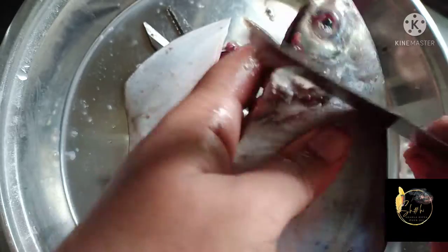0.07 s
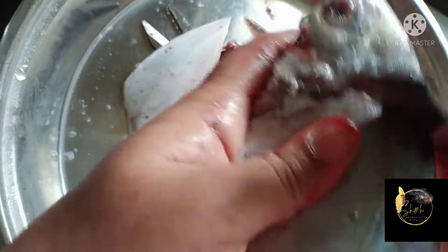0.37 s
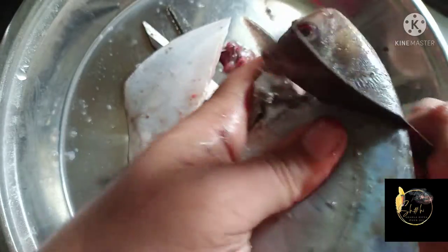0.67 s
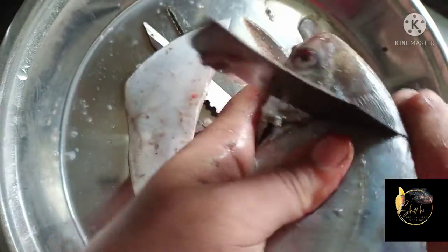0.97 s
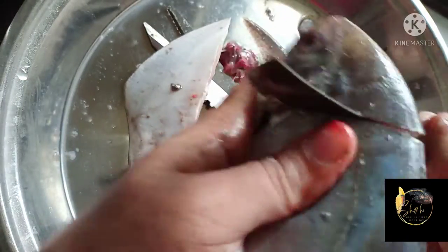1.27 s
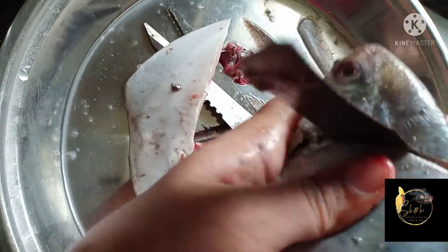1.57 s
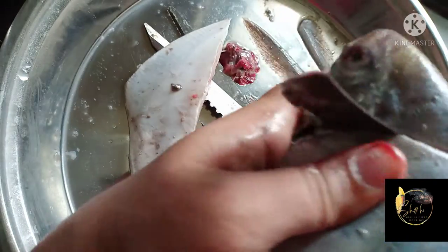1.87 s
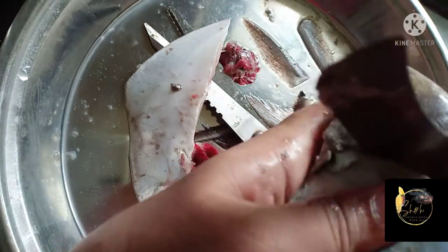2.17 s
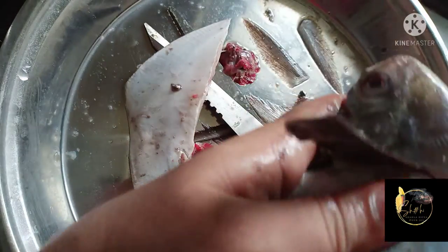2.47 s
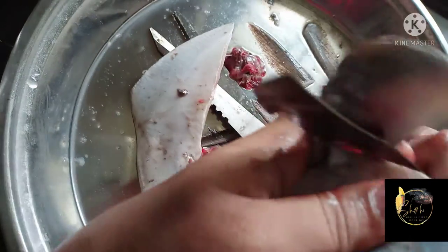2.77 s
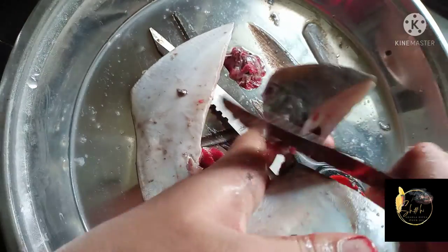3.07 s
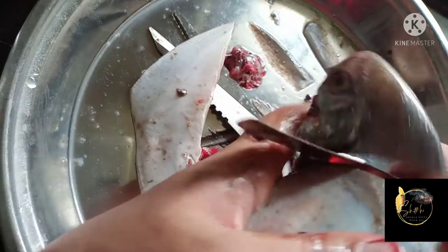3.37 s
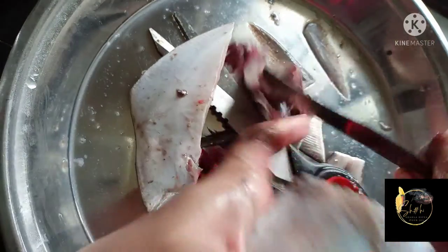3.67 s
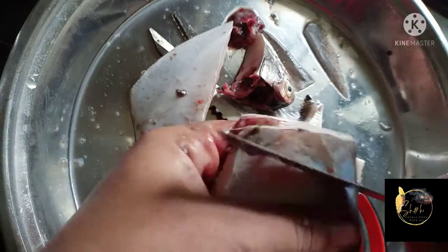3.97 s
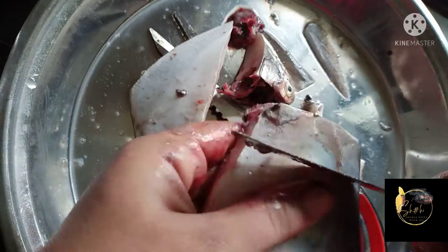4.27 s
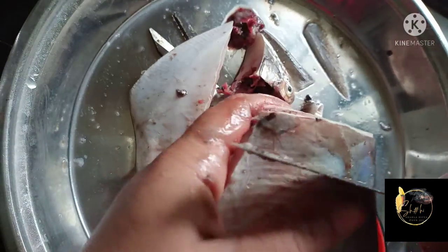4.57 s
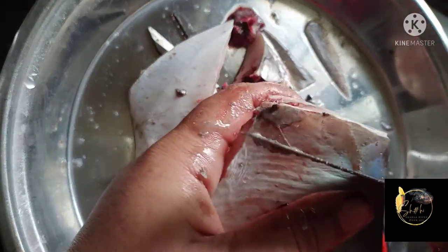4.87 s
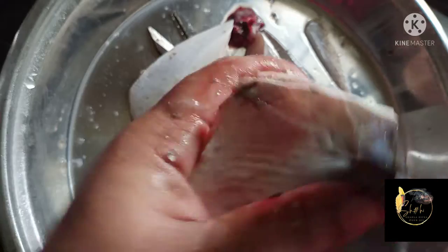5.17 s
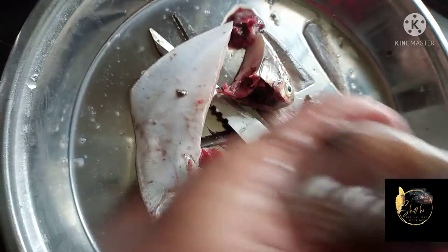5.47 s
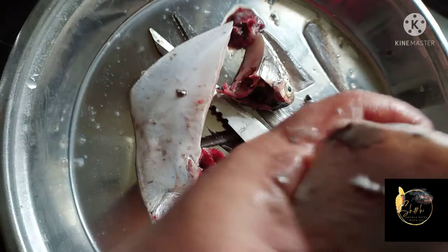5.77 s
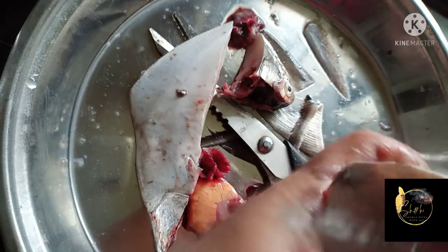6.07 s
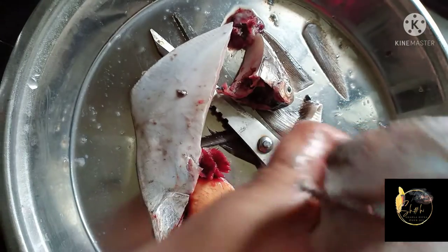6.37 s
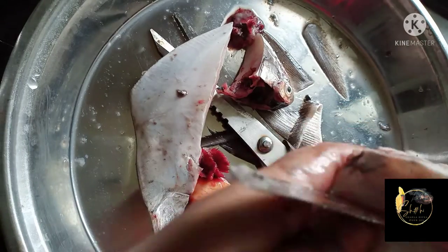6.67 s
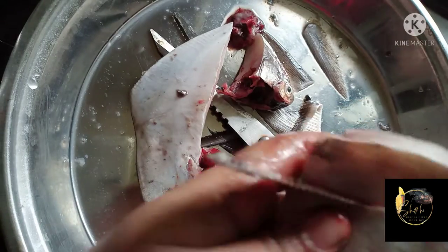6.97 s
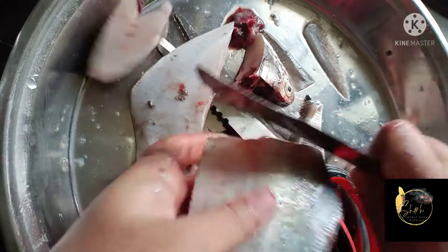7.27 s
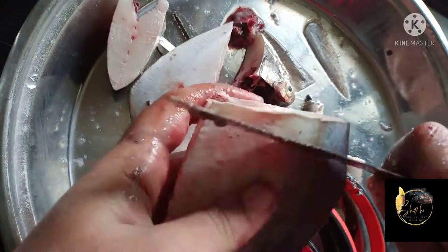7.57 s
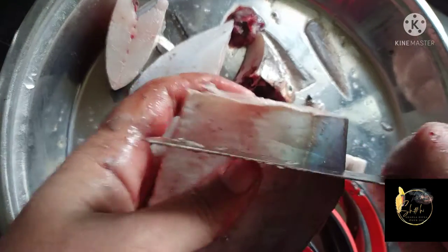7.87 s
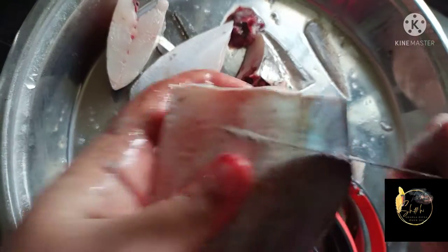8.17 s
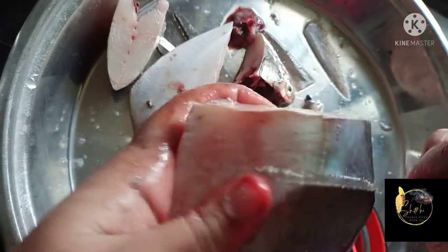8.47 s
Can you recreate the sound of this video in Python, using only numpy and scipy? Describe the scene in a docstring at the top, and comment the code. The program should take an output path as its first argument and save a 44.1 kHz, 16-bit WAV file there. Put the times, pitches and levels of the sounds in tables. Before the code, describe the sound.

Close knife sawing rasps through fish skin and snaps small bones, while cut pieces thud wetly into a ringing steel basin.

```python
"""In a kitchen, close by, a serrated knife saws through a fish over a steel basin.
The teeth rasp through skin and snap small bones, and the blade squeaks as it sticks and slips.
Once it breaks through and clinks on steel. Cut pieces land with wet thuds that ring the basin.
A fan hums over a steady hiss, and a few faint clicks come from farther off."""
import sys
import numpy as np
from scipy import signal
from scipy.fft import rfft
from scipy.io import wavfile
from scipy.ndimage import map_coordinates

SR = 44100
rng = np.random.default_rng(int(sys.argv[2]) if len(sys.argv) > 2 else 0)


def pcm_store(signal):
    """Save signal as 16-bit PCM."""
    levels = np.round(np.clip(np.atleast_2d(signal), -1, 1) * 32767)
    wavfile.write(sys.argv[1], SR, levels.astype(np.int16).T)


N = 379701

# strokes of the knife: t/s, length/s, level/dB
SAW_STROKES = [(0.274, 0.078, -56.5), (0.382, 0.078, -64.5), (0.482, 0.078, -56.5), (0.59, 0.078, -61),
               (0.706, 0.067, -60.5), (0.846, 0.056, -67), (0.951, 0.08, -56.5), (1.039, 0.087, -59),
               (1.153, 0.058, -54.5), (1.237, 0.09, -49.5), (1.323, 0.091, -51.5), (1.431, 0.083, -57),
               (1.528, 0.06, -54.5), (1.636, 0.098, -51), (1.748, 0.098, -53.5), (1.869, 0.086, -52),
               (1.968, 0.077, -51), (2.066, 0.075, -52.5), (2.153, 0.094, -64.5), (2.433, 0.085, -56),
               (2.576, 0.055, -50), (2.666, 0.066, -51.5), (3.363, 0.09, -60), (5.023, 0.07, -65.5),
               (5.174, 0.074, -58.5), (5.276, 0.083, -57), (5.389, 0.069, -54), (5.478, 0.089, -57),
               (5.572, 0.08, -58.5), (5.682, 0.07, -53.5), (5.778, 0.087, -59), (5.892, 0.072, -58),
               (5.969, 0.1, -58.5), (6.084, 0.06, -52), (6.16, 0.092, -55.5), (6.25, 0.025, -61),
               (6.361, 0.096, -65.5), (6.668, 0.082, -69), (6.774, 0.11, -62.5), (6.892, 0.108, -62.5),
               (7.024, 0.054, -63.5), (8.07, 0.093, -58.5), (8.179, 0.092, -58), (8.302, 0.076, -55),
               (8.428, 0.078, -57), (8.536, 0.082, -56.5)]
# notes the steel basin rings at: f/Hz, level/dB, t60/s (time to fade by 60 dB)
BASIN_NOTES = [(172.4, -53, 0.19), (228, -38.5, 0.144), (263, -51.5, 0.38), (307, -40.5, 0.23),
               (330, -26, 0.035), (359.5, -45, 0.45), (402, -31.5, 0.05), (500, -33.5, 0.19),
               (533.3, -43.5, 0.4), (555.5, -27.5, 0.09), (652, -39, 0.14), (876, -52.5, 0.31),
               (780, -40.5, 0.055), (1132, -46.5, 0.15), (1540, -42, 0.18), (1646, -26.5, 0.047),
               (2028, -26.5, 0.034), (1614, -50.5, 0.86), (1639, -49, 0.38), (1822, -58.5, 1),
               (1856, -50.5, 0.82), (2010, -57, 0.78), (2388, -50, 0.42), (2760, -47, 0.44),
               (2854, -49, 0.56), (2900, -44, 0.3)]


def amp(db):
    """Turns decibels into a gain."""
    return 10 ** (np.asarray(db) / 20)


def evened(x):
    """Scales x to an average (rms) size of 1."""
    return x / np.sqrt(np.mean(x ** 2) + 1e-20)


def read(points, hz):
    """Reads between a table's rows on a log-frequency axis."""
    f, value = np.transpose(points)
    return np.interp(np.log(hz + 1), np.log(f + 1), value)


def add(mix, start, sound):
    """Mixes a sound in at a start time in seconds."""
    part = mix[max(round(start * SR), 0):][:len(sound)]
    part += sound[:len(part)]


def seconds(length):
    """The time of each sample over this length."""
    return np.arange(int(length * SR)) / SR


def coloured(x, tone):
    """Shapes the lows and highs of x by a tone table; rms 1."""
    gain = amp(read(tone, np.fft.rfftfreq(len(x), 1 / SR)))
    return evened(np.fft.irfft(rfft(x) * gain, len(x)))


def pulse(tone, size=4096):
    """The shortest sudden tap with this tone; peak 1."""
    log_gain = np.log(amp(read(tone, abs(np.fft.fftfreq(size, 1 / SR)))))
    shape = np.fft.ifft(np.exp(np.conj(signal.hilbert(log_gain)))).real
    return shape / abs(shape).max()


def drift(rate):
    """A smooth random wobble, changing about rate times a second; rms 1."""
    knots = rng.standard_normal(int(N / SR * rate) + 4)
    return evened(map_coordinates(knots, [np.arange(N) * rate / SR], order=2))


def ticks(per_s, spread_db):
    """Tiny random ticks of uneven size; rms 1."""
    size = amp(spread_db * np.minimum(rng.exponential(1, N), 4)) * rng.choice([-1, 1], N)
    return evened(size * (rng.random(N) < per_s / SR))


def resonate(x, hz, width_hz):
    """Makes x ring at a pitch that follows the curve hz; rms 1."""
    turn = np.exp(2j * np.pi * np.cumsum(hz) / SR)
    decay = np.exp(-np.pi * width_hz / SR)
    return evened((turn * signal.lfilter([1], np.poly([decay, decay]), x / turn)).real)


def ring(notes, lowest_hz, highest_hz):
    """Struck steel: fading notes of alternating sign, weaker outside the two limits."""
    t = seconds(1)
    out = np.zeros(len(t))
    for k, (hz, db, t60) in enumerate(notes):
        weakening = np.hypot(1, (hz / highest_hz) ** 2 + (lowest_hz / hz) ** 2)
        out += (-1) ** k * amp(db - 60 * t / t60) * np.sin(2 * np.pi * hz * t) / weakening
    return out


def room(x, wet_db, gap_s=0.005):
    """Adds the echo of a small hard room, each band fading at its own speed."""
    # how long the echo lasts: f/Hz, t60/s
    fade_times = [(150, 0.47), (500, 0.63), (2000, 0.35), (6000, 0.32), (14000, 0.24)]
    echoes = rng.standard_normal(SR) * (rng.random(SR) < 4000 / SR)
    hz, t, bands = signal.stft(echoes, SR, nperseg=256)
    tail = signal.istft(bands * amp(-60 * t / read(fade_times, hz)[:, None]), SR, nperseg=256)[1]
    tail[:int(gap_s * SR)] = 0
    return x + amp(wet_db) * signal.fftconvolve(x, tail / np.linalg.norm(tail))[:N]


def fan(turns_per_s=5.0, throb=0.25, waver=0.14, air_db=-62.5):
    """The motor's hum throbs as the fan turns, over the rush of moved air."""
    # notes of the motor: f/Hz, level/dB
    motor_notes = [(105, -81), (145.5, -75), (207.7, -70.5), (276.6, -59.5), (300, -66.5), (602, -75)]
    # tone of the air: f/Hz, level/dB
    air_tone = [(30, -56), (55, -52), (80, -24), (110, -17), (148, -5), (188, -7.5), (235, -1.5), (285, 1),
                (330, -7), (385, -16), (450, -8), (520, -9.5), (600, -4), (700, -12.5), (1200, -26)]
    t = np.arange(N) / SR
    clock = t + 0.00015 * drift(1.48)  # the pitch wanders slightly
    out = amp(air_db) * coloured(rng.standard_normal(N), air_tone + [(4000, -63)])
    turn = 2 * np.pi * (turns_per_s * t + 0.17 * drift(2.11))
    for hz, db in motor_notes:
        level = 1 + throb * np.sin(turn + 2 * np.pi * rng.random()) + waver * drift(9.7)
        out += amp(db) * np.sqrt(2) * level * np.sin(2 * np.pi * (hz * clock + rng.random()))
    return out


def hiss(level_db=-66.5):
    """A soft, steady background noise."""
    # tone of the hiss: f/Hz, level/dB
    hiss_tone = [(530, -14), (900, -11), (1080, -8), (1170, -9.5), (1440, -11), (1540, -10.5), (2130, -8),
                 (2950, -13), (3210, -9.5), (5310, -10.5), (8270, -23), (13200, -9), (15800, -20)]
    return amp(level_db) * coloured(rng.standard_normal(N), hiss_tone)


def far_clicks(below_db=-7, above_db=-15):
    """Distant clicks arrive mostly as room echo: fading noise around one pitch."""
    # faint clicks and knocks: t/s, level/dB, f/Hz, t60/s
    clicks = [(0.025, -51, 8600, 0.22), (0.030, -56, 720, 0.28), (2.953, -58.5, 5400, 0.21),
              (4.085, -57, 7300, 0.16), (4.508, -56.5, 5150, 0.21), (4.581, -51.5, 8000, 0.34)]
    out, t = np.zeros(N), seconds(.4)
    for start, db, hz, t60 in clicks:
        hump = [(hz / 20, 2 * below_db), (hz / 2, below_db), (hz, 0),
                (hz * 2, above_db), (hz * 10, 2 * above_db)]
        add(out, start, amp(db - 60 * t / t60) * coloured(rng.standard_normal(len(t)), hump))
    return out


def snapping(t60=.028):
    """Each bone gives way in a short burst of noise."""
    # larger bones breaking: t/s, level/dB
    big_snaps = [(0.2624, -40.5), (0.2932, -40), (1.973, -41), (2.0692, -45), (2.442, -40), (2.671, -36),
                 (5.517, -35.5), (5.698, -36), (5.8283, -36.5), (5.905, -35), (6.002, -39), (6.0312, -41),
                 (6.254, -41), (6.797, -36), (7.0304, -42), (7.0494, -35), (8.2067, -38.5), (8.3596, -38.5),
                 (8.45, -35.5)]
    # tone of a snap: f/Hz, level/dB
    snap_tone = [(1500, -31), (3200, 0.5), (4000, -15), (5000, -4.5), (7500, -14.5), (11000, -7),
                 (13300, 6), (16000, -2)]
    out, t = np.zeros(N), seconds(0.038)
    for start, db in big_snaps + small_snaps():
        burst = coloured(rng.standard_normal(len(t)), snap_tone) * amp(-60 * t / t60)
        add(out, start, amp(db) * burst / abs(burst).max())
    return out


def small_snaps(catch_db=-1, bones_per_s=11, bone_db=-48, spread_db=2):
    """Teeth catch as each stroke starts, and a fine bone may break along it: t/s, level/dB."""
    count = len(SAW_STROKES)
    draws = zip(SAW_STROKES, rng.random((count, 2)), rng.standard_normal(count))
    bones = [(start + place * length, bone_db + spread_db * size)
             for (start, length, _), (chance, place), size in draws if chance < bones_per_s * length]
    return [(start, db + catch_db) for start, _, db in SAW_STROKES] + bones


def sawing(rasp_db=2.0, low_db=-3.5, high_db=-7.5, rub_db=-14, swell=1.16, bite=0.31, body_db=-2.0):
    """Each stroke bites, speeds up and slows; the teeth rasp and make the blade ring at two pitches."""
    # tone of teeth on skin: f/Hz, level/dB
    rasp_tone = [(2000, -23), (3300, -5.5), (3800, -3.5), (4300, -9.5), (5700, -6), (7300, -15.5),
                 (9000, -12.5), (11000, -8.5), (12000, -6.5), (13300, 2.5), (14200, -5), (15000, -13.5),
                 (16000, -1.5)]
    # tone of flesh on the flat of the blade: f/Hz, level/dB
    rub_tone = [(300, -31), (800, -8.5), (1200, 3), (1600, 1.5), (2000, 5), (2600, -5.5), (4000, -22)]
    # the blade rings freely cutting off the head, and is muffled and stiffened deep in the body:
    # t/s, low ring f/Hz, low ring level/dB, high ring level/dB
    blade_ringing = [(0.3, 3190, -1.5, -13), (1.3, 3120, -3, -13), (1.55, 3150, -8, -23),
                     (1.85, 3140, 0, -5), (2.1, 3360, -6.5, -7), (2.55, 3330, -1, 1), (3.4, 3300, -10, -1),
                     (5.2, 3360, -16, -11), (6.2, 3380, -30, -3), (6.85, 3420, -5, 0.5),
                     (8.25, 3280, -8, -2), (8.6, 3400, -15, -9)]
    firm_db, rub_growth = -58, 0.3  # an ordinary stroke; dB of rub gained per dB of stroke
    teeth = ticks(per_s=9000, spread_db=3) * amp(1.7 * drift(260))  # teeth catch on fibres
    teeth += 0.19 * ticks(per_s=120, spread_db=5.5)  # now and then a scale crackles
    grip = drift(12)  # flesh clamps the blade at changing places and shifts its pitches
    times, pitches, lows, highs = np.transpose(blade_ringing)
    low_hz = np.interp(np.arange(N) / SR, times, pitches)
    low_ring = resonate(teeth, low_hz * (1 + .016 * grip), width_hz=580)
    high_ring = resonate(teeth, 4850 * (1 + 0.012 * grip), width_hz=1350)
    voices = np.array([coloured(teeth, rasp_tone), low_ring, high_ring, coloured(teeth, rub_tone)])
    out, t = np.zeros(N), seconds(0.014)
    for start, length, db in SAW_STROKES:
        progress = seconds(length) / length
        speed = evened(np.sin(np.pi * progress) ** swell + bite * (1 - progress))
        low, high = np.interp(start, times, lows), np.interp(start, times, highs)
        rub = (rub_growth - 1) * (db - firm_db)  # lighter strokes have a larger share of rub
        gains = amp([rasp_db, low + low_db, high + high_db, rub + rub_db])
        scrape = gains @ voices[:, round(start * SR):][:, :len(speed)]
        scrape *= speed[:len(scrape)]
        # the blade's many notes, muffled by flesh, colour every stroke differently
        body = rng.standard_normal(len(t)) * amp(-60 * t / .03)
        body = amp(body_db) * body / np.linalg.norm(body)
        body[0] = 1  # lets the plain scrape through
        add(out, start, amp(db) * signal.fftconvolve(scrape, body / np.linalg.norm(body)))
    return out


def squeaking(width_hz=260):
    """The blade sticks and slips in the cut, briefly singing at one pitch."""
    # single squeaks: t/s, length/s, f/Hz, level/dB
    squeaks = [(0.298, 0.049, 5700, -60), (2.69, 0.02, 4770, -48.5), (4.586, 0.041, 7600, -71),
               (5.505, 0.021, 4730, -56), (6.208, 0.0223, 4840, -55), (6.249, .016, 4830, -51.5)]
    out = np.zeros(N)
    for start, length, hz, db in squeaks + small_squeaks():
        slips = rng.standard_normal(int(length * SR))
        squeak = resonate(slips, np.full(len(slips), hz), width_hz)
        add(out, start, amp(db) * squeak * signal.windows.tukey(len(slips)))
    return out


def small_squeaks(slip_s=0.018, typical_hz=4690, scatter=0.121, slip_db=-5, max_db=-61.5):
    """Every stroke squeaks near its fastest point: t/s, length/s, f/Hz, level/dB."""
    count = len(SAW_STROKES)
    draws = zip(SAW_STROKES, rng.random(count), rng.standard_normal(count))
    return [(start + (.2 + .4 * place) * length, slip_s, typical_hz * np.exp(scatter * pitch),
             min(db + slip_db, max_db))  # a hard push cuts clean and squeaks no louder
            for (start, length, db), place, pitch in draws]


def clinking(crack_db=-12.5, basin_db=-0.5, blade_db=-2.5, rattle_db=-27, rattle_t60=0.072):
    """Steel on steel: a hard crack and brief rattle, then basin and blade ring on."""
    # the blade strikes and chatters: t/s, level/dB, blade ring level/dB
    strikes = [(2.7197, 3, -6.5), (2.7267, -6.5, -17), (2.7331, -18, -35), (2.7701, -34, 0.5)]
    # tone of a strike: f/Hz, level/dB
    strike_tone = [(60, -63), (250, -5), (550, 2), (750, -19), (1100, -8.5), (1350, -3), (1700, 5.5),
                   (2050, 0), (2500, -10.5), (3400, -5), (4200, -18), (7500, -24), (9400, -16),
                   (11000, -16.5), (13400, -5), (16000, -20.5)]
    # notes the blade rings at: f/Hz, level/dB, t60/s
    blade_notes = [(3326, -33.5, 0.6), (3450, -44, 0.074), (4230, -57, 0.29), (5981, -65, .5),
                   (9324, -74, .2), (13400, -49, .15)]
    crack, metal, t = np.zeros(N), np.zeros(N), seconds(.2)
    for start, db, ring_db in strikes:
        add(crack, start, amp(db + crack_db) * pulse(strike_tone))
        rattle = coloured(rng.standard_normal(len(t)), strike_tone)
        add(crack, start, amp(db + rattle_db - 60 * t / rattle_t60) * rattle)
        add(metal, start, amp(db + basin_db) * ring(BASIN_NOTES, lowest_hz=604, highest_hz=9000))
        add(metal, start, amp(ring_db + blade_db) * ring(blade_notes, lowest_hz=600, highest_hz=14000))
    return room(crack, wet_db=-9.5) + metal


def dropping(push_db=-26, basin_db=1, splash_t60=0.075):
    """Soft flesh pushes the basin floor, rings its low notes, jolts loose steel and squirts water."""
    # pieces land, and their weight and softness set which notes ring:
    # t/s, level/dB, lowest f/Hz, highest f/Hz, splash level/dB, tool level/dB
    landings = [(2.7345, -12.5, 380, 900, -56, -62), (2.7703, 1, 255, 840, -42.5, -52),
                (3.711, 3.5, 150, 407, -32.5, -46), (3.7193, -4, 150, 458, -33.5, -51),
                (7.2469, -9, 300, 600, -49, -78), (7.2504, -3, 430, 630, -50, -49.5),
                (7.323, -26, 380, 634, -79, -80)]
    # tone of a thud: f/Hz, level/dB
    thud_tone = [(40, -42), (100, -13), (175, 1.5), (250, -3), (330, 12), (450, -7.5), (620, -3.5),
                 (760, -12), (1100, -27), (1900, -22), (3500, -28), (6000, -32), (16000, -38.5)]
    # notes of a steel tool lying in the basin: f/Hz, level/dB, t60/s
    tool_notes = [(4820, -1.5, 0.15), (5180, -19, 0.18), (5600, -4, 0.12)]
    # tone of the water: f/Hz, level/dB
    splash_tone = [(400, 4.5), (1000, -0.5), (2800, 2), (4000, -5), (5200, -1.5), (7500, -8), (10000, -12),
                   (13300, 6), (16000, -9)]
    push, metal, splash, t = np.zeros(N), np.zeros(N), np.zeros(N), seconds(.3)
    for start, db, lowest_hz, highest_hz, splash_db, tool_db in landings:
        add(push, start, amp(db + push_db) * pulse(thud_tone))
        add(metal, start, amp(db + basin_db) * ring(BASIN_NOTES, lowest_hz, highest_hz))
        add(metal, start, amp(tool_db) * ring(tool_notes, lowest_hz=600, highest_hz=14000))
        add(splash, start, amp(splash_db - 60 * t / splash_t60))
    water = splash * coloured(ticks(per_s=9000, spread_db=2.5), splash_tone)
    return room(push, wet_db=-9.5) + metal + room(water, wet_db=-6.5)


def scene(bass_cut_hz=125):
    """Knife, fish and basin in the humming kitchen, in mono."""
    cutting = room(sawing() + snapping() + squeaking(), wet_db=-13.5)
    # a small basin gives off little bass
    bass_cut = signal.butter(3, bass_cut_hz, "highpass", fs=SR, output="sos")
    blows = signal.sosfilt(bass_cut, clinking() + dropping())
    return (cutting + blows + hiss() + far_clicks() + fan())[None]


def record(dry):
    """Cuts off the very highest treble."""
    top_hz = 15650
    treble_cut = signal.firwin(511, top_hz, window=("kaiser", 9), fs=SR)
    return signal.oaconvolve(dry, treble_cut[None], "same")


dry = scene()
out = record(dry)
pcm_store(out)
```